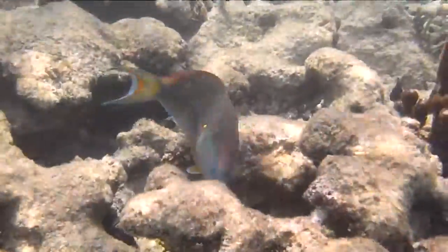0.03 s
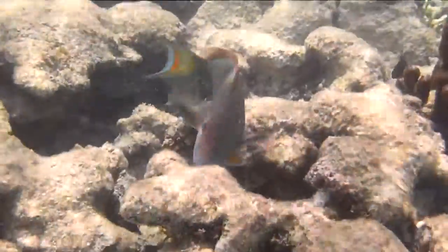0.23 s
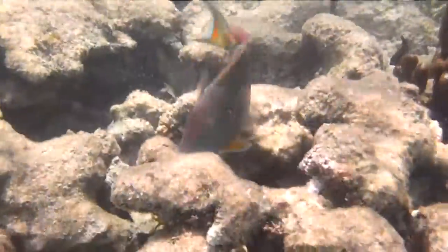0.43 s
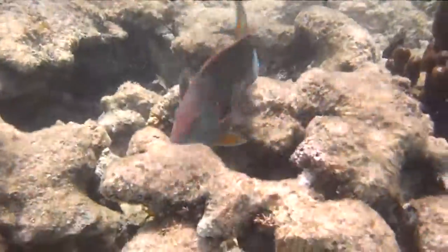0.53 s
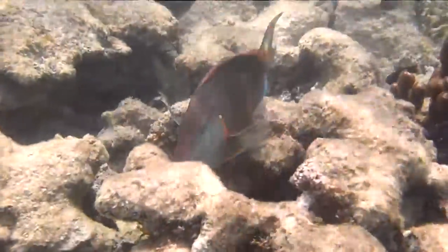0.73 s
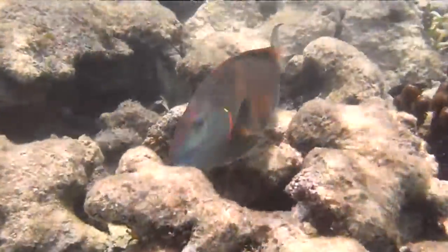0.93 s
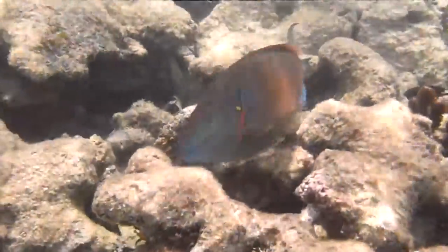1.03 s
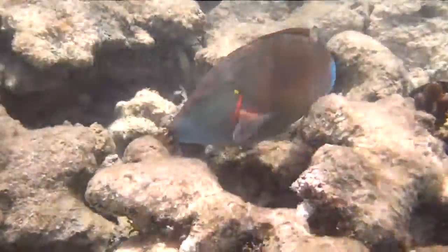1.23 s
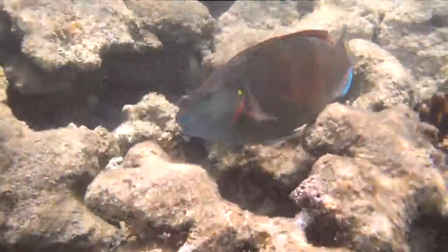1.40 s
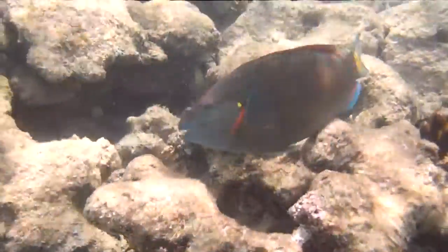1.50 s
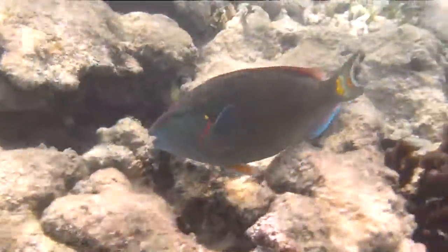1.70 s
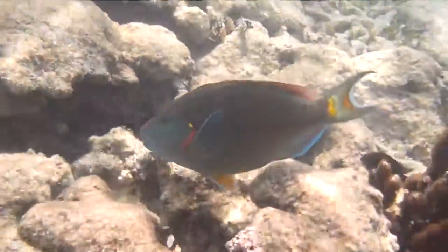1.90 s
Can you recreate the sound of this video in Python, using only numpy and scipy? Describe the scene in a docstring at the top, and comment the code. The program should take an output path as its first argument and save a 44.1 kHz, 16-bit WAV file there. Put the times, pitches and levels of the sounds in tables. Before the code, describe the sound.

One brief, crunchy underwater scrape of a fish biting coral, over clicking shrimp and rumbling water.

```python
"""A parrotfish takes one bite of coral, close to an underwater camera housing.
Its beak scrapes in three quick strokes; each crack is a falling chirp with grit and a low thump.
Snapping shrimp make the housing ring, soft knocks come and go, and all of these echo briefly.
Behind them the water gives a few low pushes, and the reef crackles over a low rumble."""
import sys
import numpy as np
from scipy import signal
from scipy.fft import rfft, irfft
from scipy.io import wavfile

SR = 44100
rng = np.random.default_rng(int(sys.argv[2]) if len(sys.argv) > 2 else 0)


def pcm_store(signal):
    """Save signal as 16-bit PCM."""
    levels = np.round(np.clip(np.atleast_2d(signal), -1, 1) * 32767)
    wavfile.write(sys.argv[1], SR, levels.astype(np.int16).T)


N = 85995
TIME = np.arange(N) / SR
T = TIME[:4096]  # seconds within one short sound

# Cracks in the coral. Each row: start in seconds, chirp in dB, base pitch in Hz, thump in dB, grit in dB.
CRACKS = [(0.4087, -26.5, 1120, -32.5, -37.5), (0.4135, -21, 1078, -17.5, -37),
          (.4250, -16, 1215, -11.5, -27), (0.4287, -11, 1016, -24, -25.5), (0.4338, -6.5, 974, -16, -26.5),
          (0.4431, -15.5, 1210, -30, -28.5), (0.4507, -12.5, 1160, -21, -31),
          (0.4735, -18, 1293, -26.5, -29), (0.4758, -35, 1230, -9, -22.5), (0.484, -17, 1093, -22, -31),
          (0.494, -17, 1323, -38, -30), (0.5154, -22.5, 1324, -43, -40), (0.5191, -11.5, 1034, -20.5, -32),
          (0.5277, -14, 1360, -11.5, -23.5), (0.5338, -12, 1000, -13.5, -27), (.541, -23, 1070, -19, -37),
          (0.551, -46, 990, -16.5, -60), (0.565, -36, 890, -19, -52)]
# The low ring after a crack. Each row: pitch in Hz, level in dB, seconds to fade by 60 dB.
THUMP_TONES = [(243, -4.5, 0.072), (338.5, -3.5, .045), (434, -0.5, 0.05), (739, -7.5, 0.046)]
# How hard the beak presses on the coral. Each row: time in seconds, level in dB.
SCRAPE_LEVEL = [(.395, -54), (.414, -27), (.435, -26), (.462, -28.5), (.48, -24), (.51, -33.5), (.53, -22),
                (.55, -39), (.572, -39), (.595, -58)]
# The tones the housing rings with. Each row: pitch in Hz, level in dB, seconds to fade by 60 dB.
HOUSING_TONES = [(440.4, 1, 0.039), (726, 7, 0.047), (1169, 1.5, 0.0064), (1384, 0, 0.01),
                 (1825, 8.5, 0.014), (2360, -16, .012), (2925, 5, 0.01), (3385, -3.5, 0.0053),
                 (4330, -14.5, 0.016), (4910, -11, 0.0047), (7800, -36.5, 0.0024), (10700, -40, .005)]
# Near shrimp snaps. Each row: start in seconds, then the ring's level in dB in five bands, low to high.
SNAPS = [(0.0324, -35.5, -46, -22.5, -26.5, -26.5), (0.2006, -25, -29.5, -21, -19, -26),
         (0.3452, -45.5, -62, -39.5, -37.5, -47), (.6195, -35, -50, -35, -33, -33.5),
         (1.5094, -28, -36, -22, -39, -43), (1.7584, -20, -17.5, -14.5, -18, -26),
         (1.7616, -18.5, -31, -19, -30, -32.5)]
# The edges of those five bands, in Hz.
SNAP_BANDS = [0, 560, 900, 1600, 2400, 16000]
# Small shrimp ticks. Each row: start in seconds, level in dB, share of fizz from 0 to 1.
TICKS = [(.0812, -39.5, 0.56), (.1106, -41.5, 0.15), (.2309, -51, 0.1), (0.2634, -32, 0.62),
         (.301, -45.5, 0.64), (0.3732, -43, 1), (0.587, -46.5, .4), (0.608, -46, .4), (0.6492, -50, 1),
         (0.6723, -45, 0.15), (0.751, -35.5, 0.39), (0.7932, -40, 0.2), (0.8898, -40, 0.31),
         (0.9764, -45, 0), (1.0997, -38, 0.16), (1.1686, -40.5, 0.43), (1.2223, -31, 0.12),
         (1.265, -37.5, 0), (1.329, -48.5, 1), (1.373, -70, 0.6), (1.477, -42, 0.62), (1.555, -43, 0.8),
         (1.5732, -44.5, 1), (1.6234, -47, 0.2), (1.631, -42, 0.8), (1.6441, -37, 0.1),
         (1.7097, -35.5, 0.22), (1.728, -26, 0.19), (1.7745, -40.5, 0.65), (1.8123, -45, 0),
         (1.8243, -45.5, 0), (1.8939, -34.5, 0.55)]
# Soft knocks. Each row: time of the peak in seconds, level in dB, pitch in Hz, half length in seconds.
KNOCKS = [(.141, -35, 686, 0.0041), (.601, -28, 150, 0.0028), (0.6562, -17.5, 380, 0.002),
          (.691, -36.5, 1160, .003), (.709, -25.5, 406, 0.0021), (0.75, -29, 375, 0.003),
          (0.76, -29.5, 430, 0.0053), (0.854, -28.5, 378, 0.0022), (0.955, -29, 738, 0.0046),
          (1.270, -27, 400, 0.0027), (1.3361, -24, 436, 0.0036), (1.505, -20, 416, 0.0036),
          (1.511, -31, 218, 0.0044), (1.553, -30.5, 760, 0.0023)]
# Low pushes of water. Each row: start in seconds, level in dB.
PUSHES = [(0.445, -28.5), (.474, -40), (.524, -28.5), (0.598, -36.5), (.618, -35.5), (1.757, -34)]
# How loud the background wash is. Each row: time in seconds, level in dB.
WASH_LEVEL = [(0, -44.5), (.15, -47), (.3, -48.5), (.55, -47), (.64, -48), (.72, -46), (1.0, -44),
              (1.45, -45), (1.7, -44), (1.95, -46)]
# The edges of the bands in which the wash flutters, in Hz.
FLUTTER_BANDS = [0, 180, 560, 900, 1500, 2400]

# A colour says which pitches are strong in a sound. Each row: frequency in Hz, level in dB.
SCRAPE_COLOUR = [(60, -23), (160, -1), (245, -0.5), (430, 10), (560, -27.5), (760, -2), (1050, -0.5),
                 (1430, -15.5), (1800, 0.5), (2300, -34.5), (4800, -51.5), (6500, -54.5), (14000, -62)]  # the beak grinding
GRIT_COLOUR = [(200, -30.5), (1200, -13), (1850, 11.5), (2300, 3.5), (3200, -5), (4900, -10), (5400, -18),
               (7600, -28), (8600, -35), (11000, -38), (14000, -54)]  # bits of coral breaking off
WALL_COLOUR = [(500, 2.5), (760, 2), (870, -8), (1050, 1), (1250, -1.5), (1450, -10), (1750, 10.5),
               (2200, 1)]  # what the housing wall lets through of the chirps
FIZZ_COLOUR = [(300, -30.5), (1500, 6.5), (2400, 2), (4500, -1.5), (7000, -8.5), (9000, -14.5),
               (11500, -17.5), (14000, -27)]  # the dry spray of a snap
POPS_COLOUR = [(430, -2.5), (720, 1), (1250, 7.5), (1850, -9)]  # far, dull snaps
WASH_COLOUR = [(20, 0.5), (40, -10.5), (80, -5), (150, -9.5), (250, -8.5), (430, -5.5), (570, -10),
               (720, -7.5), (930, -16.5), (1250, -6.5), (1500, -16.5), (1730, -13), (2150, -27.5),
               (2550, -27), (2930, -40.5), (3400, -31.5), (5300, -46), (8000, -48), (14000, -56.5)]  # the water and the distant reef

CHIRP_RISE_S, CHIRP_FADE_S, CHIRP_FALL_S = 0.00089, 0.0049, 0.002
THUMP_LAG_S, THUMP_RISE_S = 0.0012, 0.00084
GRIT_FADE_S, SPLASH_FADE_S, FIZZ_FADE_S = 0.0018, 0.0025, 0.0009
SPLASH_DB, TICK_FIZZ_DB = -14.5, 2.5
RING_RISE_CYCLES, RING_HOLD_S, RING_TREBLE_HZ = 0.88, 0.0031, 2320
ECHO_DB, ECHO_RISE_S, ECHO_FADE_S = -14.5, 0.0013, 0.047
FAR_POPS_DB, FAR_TICKS_DB, FAR_FIZZ_DB = -48, -69, -71
FLUTTER_DB, FLUTTER_HZ = 1.94, 74


def bite():
    """The beak grinds over the coral; each crack chirps downward, thumps and sheds grit."""
    grains = unit(colour(clicks(per_s=1900, spread_db=5), SCRAPE_COLOUR))
    pressure_db = np.interp(TIME, *np.transpose(SCRAPE_LEVEL), left=-np.inf, right=-np.inf)
    out = grains * amp(pressure_db)
    chirp_shape = peaked(soft_start(CHIRP_RISE_S) * np.exp(-T / CHIRP_FADE_S))
    # Each chirp falls from 1.48 to 0.8 times its base pitch.
    glide = np.cumsum(0.8 + 0.68 * np.exp(-T / CHIRP_FALL_S)) / SR
    chirps = np.zeros(N)
    low_ring = thump()
    for start, chirp_db, hz, thump_db, grit_db in CRACKS:
        add(chirps, start, amp(chirp_db) * chirp_shape * np.sin(2 * np.pi * hz * glide))
        add(out, start + THUMP_LAG_S, amp(thump_db) * low_ring)
        add(out, start, amp(grit_db) * burst(GRIT_COLOUR, GRIT_FADE_S))
    return out + colour(chirps, WALL_COLOUR)


def thump():
    """A few low tones ring on after a crack; every second one is flipped upside down."""
    tones = sum((-1) ** k * amp(db - 60 * T / fade_s) * np.sin(2 * np.pi * hz * T)
                for k, (hz, db, fade_s) in enumerate(THUMP_TONES))
    return peaked(tones * soft_start(THUMP_RISE_S))


def shrimp():
    """Near snaps ring the whole housing, small ticks mostly its high tones; noise adds a fizz."""
    out = np.zeros(N)
    for start, *levels in SNAPS:
        bands = zip(levels, SNAP_BANDS, SNAP_BANDS[1:])
        ring = sum(amp(db) * housing(low, high) for db, low, high in bands)
        splash = amp(levels[-1] + SPLASH_DB) * burst(FIZZ_COLOUR, SPLASH_FADE_S)
        add(out, start, ring + splash)
    for start, db, share in TICKS:
        ring = tick()
        fizz = amp(TICK_FIZZ_DB) * burst(FIZZ_COLOUR, FIZZ_FADE_S)
        add(out, start, amp(db) * ((1 - share) * ring + share * fizz))
    return out


def tick():
    """A small snap; each one rings the upper tones of the housing a little differently."""
    middle = housing(SNAP_BANDS[2], SNAP_BANDS[4], scatter_db=2, detune=0.015)
    treble = housing(SNAP_BANDS[4], SNAP_BANDS[5], scatter_db=2, detune=0.015)
    return treble + amp(-7) * middle


def housing(low_hz, high_hz, scatter_db=0, detune=0):
    """The housing rings between two pitches; each tone swells, holds briefly and dies away."""
    out = np.zeros(len(T))
    for k, (hz, db, fade_s) in enumerate(HOUSING_TONES):
        louder, sharper = rng.standard_normal(2)
        if low_hz < hz <= high_hz:
            swell = soft_start(RING_RISE_CYCLES / min(hz, RING_TREBLE_HZ))
            hold_s = RING_HOLD_S * min(1, RING_TREBLE_HZ / hz) ** 2  # shorter for high tones
            faded_db = 60 * np.maximum(T - hold_s, 0) / fade_s
            tone = np.sin(2 * np.pi * hz * (1 + detune * sharper) * T + k ** 2)
            out += swell * amp(db + scatter_db * louder - faded_db) * tone
    return peaked(out)


def knocks():
    """Dull blips, only a few waves long, that rise and fall evenly."""
    out = np.zeros(N)
    for peak_s, db, hz, half_s in KNOCKS:
        from_peak = TIME - peak_s
        shape = np.exp(2 - 2 * np.hypot(from_peak / half_s, 1))
        out += amp(db) * shape * np.cos(2 * np.pi * hz * from_peak)
    return out


def echoes(sound):
    """The coral and the surface scatter a short echo back, strongest in the high pitches."""
    tail = rng.standard_normal(len(T)) * amp(-60 * T / ECHO_FADE_S)
    tail *= 1 - np.exp(-T / ECHO_RISE_S)
    tail = colour(tail / np.linalg.norm(tail), [(400, -2), (1800, 2), (4000, 7.5)])
    return amp(ECHO_DB) * signal.fftconvolve(sound, tail)[:N]


def water_pushes(hz=42, fade_s=0.0031):
    """Single slow swings of pressure as water is shoved aside."""
    swing = peaked(T * np.exp(-T / fade_s) * np.sin(2 * np.pi * hz * T))
    out = np.zeros(N)
    for start, db in PUSHES:
        add(out, start, amp(db) * swing)
    return out


def far_shrimp():
    """Far snaps blend into dull pops that follow the wash's level, ringing ticks and a dry fizz."""
    pops = crackle(lambda: housing(0, SNAP_BANDS[4], scatter_db=2, detune=0.053),
                   per_s=240, spread_db=3.5)
    pops = unit(colour(pops, POPS_COLOUR) * wash_gain())
    ticks = crackle(tick, per_s=330, spread_db=4.5)
    fizz = crackle(lambda: burst(FIZZ_COLOUR, FIZZ_FADE_S), per_s=330, spread_db=4.5)
    return amp(FAR_POPS_DB) * pops + amp(FAR_TICKS_DB) * ticks + amp(FAR_FIZZ_DB) * fizz


def wash():
    """Water rumble and the blur of the distant reef; the low bands flutter, the hiss is smooth."""
    hz = np.fft.rfftfreq(N, 1 / SR)
    spectrum = rfft(rng.standard_normal(N)) * amp(read_colour(WASH_COLOUR, hz))
    blur = irfft(spectrum * (hz >= FLUTTER_BANDS[-1]), N)
    slow_only = np.exp(-(hz / FLUTTER_HZ) ** 2)
    for low, high in zip(FLUTTER_BANDS, FLUTTER_BANDS[1:]):
        flutter = unit(irfft(rfft(rng.standard_normal(N)) * slow_only, N))
        band = irfft(spectrum * (hz >= low) * (hz < high), N)
        blur += band * amp(FLUTTER_DB * flutter)
    return unit(blur) * wash_gain()


def wash_gain():
    """The slow rise and fall of the background."""
    return amp(np.interp(TIME, *np.transpose(WASH_LEVEL)))


def crackle(make_snap, per_s, spread_db, kinds=12):
    """Many snaps at random times, in several slightly different kinds."""
    layers = (signal.oaconvolve(clicks(per_s / kinds, spread_db), make_snap())[:N] for _ in range(kinds))
    return unit(sum(layers))


def clicks(per_s, spread_db):
    """Random clicks, a few much louder than the rest."""
    hits = rng.random(N) < per_s / SR
    signs = rng.choice([-1, 1], N)
    return hits * signs * amp(spread_db * np.minimum(rng.exponential(1, N), 4))


def burst(points, fade_s, rise_s=0.0003):
    """A short spray of noise with the given colour."""
    shape = np.exp(-T / fade_s) * (1 - np.exp(-T / rise_s))
    return peaked(colour(rng.standard_normal(len(T)) * shape, points))


def colour(sound, points):
    """Gives a sound a colour, using a filter that rings only after each click, never before."""
    hz = abs(np.fft.fftfreq(len(T), 1 / SR))
    log_gain = np.log(amp(read_colour(points, hz)))
    click_response = np.fft.ifft(np.exp(np.conj(signal.hilbert(log_gain)))).real
    return signal.fftconvolve(sound, click_response[:len(T) // 2])[:len(sound)]


def read_colour(points, hz):
    """Looks up a colour's level in dB, sliding between its rows."""
    row_hz, row_db = np.transpose(points)
    return np.interp(np.log(hz + 1), np.log(row_hz), row_db)


def soft_start(rise_s):
    """Rises smoothly from zero to one."""
    return 1 - np.exp(-(T / rise_s) ** 2)


def add(mix, start_s, sound):
    """Mixes a sound in at the given time."""
    part = mix[max(round(start_s * SR), 0):][:len(sound)]
    part += sound[:len(part)]


def amp(db):
    """Turns decibels into a number to multiply by."""
    return 10 ** (np.asarray(db) / 20)


def unit(sound):
    """Scales to an average strength (rms) of one."""
    return sound / np.sqrt(np.mean(sound ** 2) + 1e-20)


def peaked(sound):
    """Scales to a peak of one."""
    return sound / (abs(sound).max() + 1e-20)


def scene():
    """The bite and the reef around it, in one channel."""
    near = bite() + shrimp() + knocks()
    return (near + echoes(near) + water_pushes() + far_shrimp() + wash())[None]


def record(dry, top_hz=14300):
    """Cuts away the very highest pitches."""
    treble_cut = signal.firwin(511, top_hz, window=("kaiser", 9), fs=SR)
    return signal.oaconvolve(dry, treble_cut[None], "same")


dry = scene()
out = record(dry)
pcm_store(out)
```